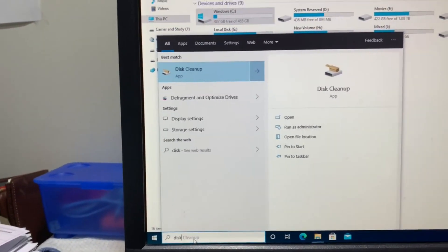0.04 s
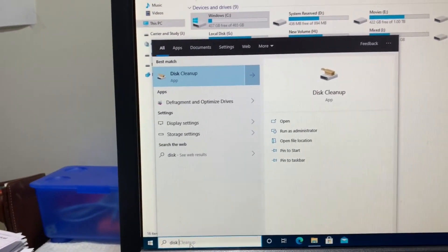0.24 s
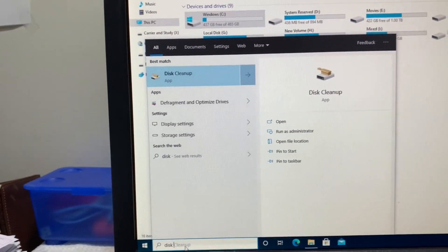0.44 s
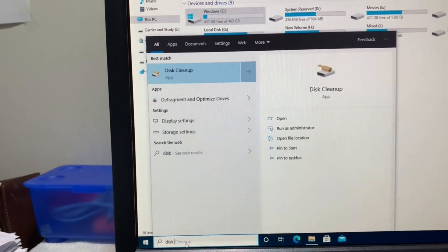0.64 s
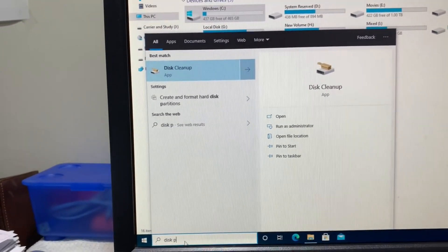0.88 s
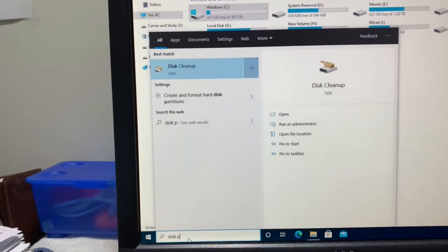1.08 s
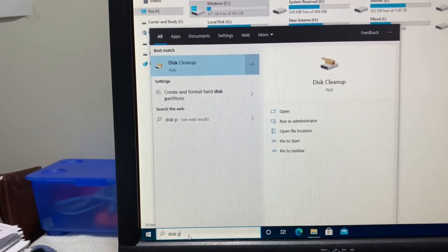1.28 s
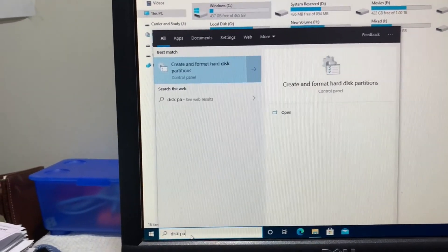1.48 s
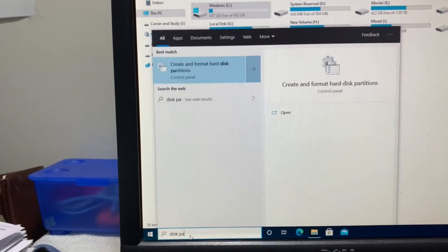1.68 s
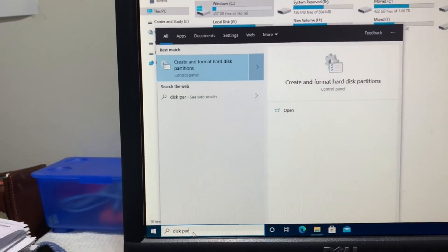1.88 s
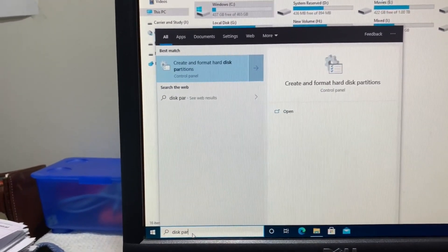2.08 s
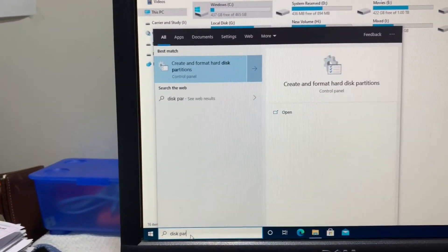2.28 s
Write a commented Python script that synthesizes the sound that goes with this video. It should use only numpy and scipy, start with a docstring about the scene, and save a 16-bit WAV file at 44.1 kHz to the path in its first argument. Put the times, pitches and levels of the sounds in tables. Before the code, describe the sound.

Slow typing on a plastic computer keyboard on a desk: a soft press, a louder space bar clatter, then spaced single keystrokes with dull thumps and springy clacks, close stereo microphone, small quiet room with low rumble.

```python
"""A few keys are typed slowly on a plastic computer keyboard on a desk, in a small quiet room.
Throughout lie a low rumble and thin hiss, both shaped noise, and a faint fan whine, a wavering sine.
From the start, noise bursts make finger ticks and landing keys; short falling sines thump the desk.
The space bar soon clatters back and knocks; more strokes follow, some with a high ping as a cap rings.
From about 0.66 s keys also spring back with a clack; the room answers with a short noise tail."""
import sys
import numpy as np
from scipy import signal
from scipy.fft import rfft, irfft, next_fast_len
from scipy.io import wavfile
from scipy.ndimage import uniform_filter1d

SR = 44100
rng = np.random.default_rng(int(sys.argv[2]) if len(sys.argv) > 2 else 0)


def wav_out(sig):
    """Save sig, one row per channel (or a flat mono array), as 16-bit PCM at SR to the path in sys.argv[1]."""
    wavfile.write(sys.argv[1], SR, np.round(np.clip(np.atleast_2d(sig).T, -1, 1) * 32767).astype(np.int16))


N = 102664  # samples in the scene


def amp(db):
    """Turn decibels into a gain."""
    return 10 ** (np.asarray(db) / 20)


def unit(x):
    """Scale to an rms (average strength) of 1."""
    return x / np.sqrt(np.mean(x ** 2) + 1e-20)


def along(points, hz):
    """Read a value between (frequency, value) points, on a log frequency axis."""
    f, v = np.transpose(points)
    return np.interp(np.log(hz + 1), np.log(f + 1), v)


def filtered(x, response):
    """Multiply the spectrum of x by a complex response of frequency."""
    n = x.shape[-1]
    padded = next_fast_len(2 * n)
    spectrum = rfft(x, padded) * response(np.fft.rfftfreq(padded, 1 / SR))
    return irfft(spectrum, padded)[..., :n]


def add(track, s, sound):
    """Mix a sound into the track at time s, trimmed to fit."""
    part = track[..., round(s * SR):][..., :sound.shape[-1]]
    part += sound[..., :part.shape[-1]]


# How alike left and right are: (frequency [Hz], likeness [0 to 1])
LIKENESS = [(60, 0.96), (200, 0.83), (500, 0.31), (1200, 0.35), (2500, 1), (15000, 0.22)]


def diffuse(size):
    """Stereo noise from all around; how alike its two sides are depends on frequency."""
    def mid_and_side(hz):
        turn = np.arccos(np.clip(along(LIKENESS, hz), -1, 1)) / 2
        return np.array([np.cos(turn), np.sin(turn)])

    mid, side = filtered(rng.standard_normal((2, size)), mid_and_side)
    return np.array([mid + side, mid - side])


def lagged(x):
    """Direct sound reaches the left microphone a little later than the right."""
    lags_s = np.array([[8 / SR], [0]])  # left, right
    return filtered(x, lambda hz: np.exp(-2j * np.pi * hz * lags_s))


def causal(gain):
    """Minimum-phase response: the given gain, with its energy as early as possible."""
    cepstrum = irfft(np.log(np.maximum(gain, 1e-6)))
    half = len(cepstrum) // 2
    cepstrum[1:half] *= 2
    cepstrum[half + 1:] = 0
    return np.exp(rfft(cepstrum))


def ringing(x, modes):
    """Add the ring of a body: each mode is a resonance that x sets going."""
    def response(f):
        total = 1
        for hz, db, t60 in modes:
            damping = 1j * f * np.log(1000) / np.pi / t60
            total = total + amp(db) * damping / (hz * hz - f * f + damping)
        return total

    return filtered(x, response)


# Colour of the room rumble: (frequency [Hz], relative level [dB])
RUMBLE_COLOUR = [(20, -53), (30, -23.5), (42, -4.5), (70, 2.5), (97, -5.5), (125, 1), (146, -9.5),
                 (184, -6.5), (220, -19.5), (264, -15.5), (325, -24), (450, -42), (900, -75)]
# Colour of the thin hiss: (frequency [Hz], relative level [dB])
HISS_COLOUR = [(240, -40), (400, -11), (820, -12), (960, -8), (1150, -14), (1450, -15), (2500, -22),
               (5000, -27), (8000, -29), (11000, -27), (13500, -31), (15500, -27)]
RUMBLE_DB, HISS_DB, WHINE_DB = -56, -77, -81.5  # rms levels at the microphones' input
WHINE_HZ, WHINE_WAVER_HZ = 1267, 5.1  # mean pitch, rms wander


def background():
    """Shaped noise makes rumble and hiss; a sine of randomly wandering pitch makes the fan whine."""
    def noise(colour):
        return unit(filtered(diffuse(N), lambda hz: amp(along(colour, hz))))

    waver = unit(uniform_filter1d(rng.standard_normal(N), size=1200))
    whine = unit(np.sin(2 * np.pi * np.cumsum(WHINE_HZ + WHINE_WAVER_HZ * waver) / SR))
    rumble, hiss = noise(RUMBLE_COLOUR), noise(HISS_COLOUR)
    return amp(RUMBLE_DB) * rumble + amp(HISS_DB) * hiss + amp(WHINE_DB) * whine


BASS_HZ, TREBLE_HZ = 403, 3120  # corners of the two tone shelves
SNAP_DB, SNAP_S = -5, 0.0057  # crack relative to rattle; its 60 dB fall time before the rise adds to it
DIRECT_DB = -2.5  # direct relative to scattered rattle
GRAIN_DB = 2.5  # rms unevenness of the rattle
CAP_WIDTH_OCT = 0.22  # half-width of a key's own resonance, in octaves
SWELL_DB, SWELL_S = -15.5, 0.023  # swell relative to the rattle's envelope; time to grow by 60 dB


def contacts(rows, colour, size=8192, lead_size=1024):
    """Plastic on plastic: noise swells briefly before each contact, then cracks and rattles."""
    out = np.zeros((2, N + lead_size))
    t = (np.arange(size) - lead_size) / SR  # zero at the moment of contact
    hz = np.fft.rfftfreq(size, 1 / SR)
    after, before = np.maximum(t, 0), np.minimum(t, 0)
    for s, db, bass_db, treble_db, t60, rise_s, cap_hz, cap_db in rows:
        rise = 1 - np.exp(-(after / rise_s) ** 2)
        snap_fall = amp(-60 * after / (SNAP_S + 2 * rise_s))
        snap = unit(rng.standard_normal(size) * rise * snap_fall)

        grain = amp(GRAIN_DB * unit(uniform_filter1d(rng.standard_normal(size), size=40)))
        swell = amp(SWELL_DB + 60 * before / SWELL_S)
        chatter = diffuse(size) + amp(DIRECT_DB) * lagged(rng.standard_normal(size))
        rattle = unit(chatter * grain * (swell + rise) * amp(-60 * after / t60))

        bass_shelf_db = bass_db / (1 + (hz / BASS_HZ) ** 2)
        treble_shelf_db = treble_db * hz ** 2 / (hz ** 2 + TREBLE_HZ ** 2)
        octaves_off = np.log2((hz + 1) / cap_hz)
        peak_db = cap_db / (1 + (octaves_off / CAP_WIDTH_OCT) ** 2)
        tone = amp(bass_shelf_db + treble_shelf_db + peak_db)
        body = causal(unit(amp(along(colour, hz))) * tone)

        contact = irfft(rfft(amp(SNAP_DB) * lagged(snap) + rattle) * body)
        add(out, s, amp(db - 16.5) * contact)  # one trim for every contact
    return out[:, lead_size:]


# Fingers meeting or brushing key caps: (time [s], relative level [dB], bass shelf [dB],
# treble shelf [dB], rattle's 60 dB fall [s], rise [s], key resonance [Hz], its boost [dB])
TOUCH_ROWS = [(.0148, -51, 18, -3, 0.016, 0.0022, 2400, -1),
              (.1175, -41, -3, -12.5, 0.032, 0.00054, 1600, 2), (.494, -68, 21, 8, 0.009, 0.0026, 3000, 1),
              (.5, -48.5, 10, -5.5, 0.073, 0.00023, 2900, 11),
              (.506, -56, -5, -7, 0.075, 0.00045, 1500, 15.5),
              (.524, -52.5, 9, -3.5, 0.078, 0.0029, 3320, 5.5),
              (.643, -63.5, 31, -3, 0.11, 0.00053, 3200, 17),
              (1.0818, -46, -11, 0, 0.025, 0.0001, 3000, 8.5),
              (1.088, -42.5, -10, -14, 0.057, 0.0017, 3000, 4),
              (1.153, -52.5, 25, 1.5, 0.022, 0.0056, 2800, -4),
              (1.173, -50.5, -2, -12, .03, 0.0011, 1900, 7.5),
              (1.2055, -58.5, 17, -10.5, .015, 0.00035, 3700, 5.5),
              (1.24, -53.5, 34, -17, 0.1, 0.00077, 2820, 7),
              (1.262, -47.5, 21, -9, 0.11, 0.0024, 2700, 0.5),
              (1.277, -50.5, 15, -2.5, 0.12, 0.0046, 2780, 5),
              (1.289, -42.5, -4, -18.5, 0.057, 0.00074, 3900, 10),
              (1.321, -52.5, 7, -21.5, 0.031, 0.0013, 2530, 10.5),
              (1.545, -41.5, 16, -3, 0.095, 0.002, 2900, 1.5),
              (1.56, -57.5, 21, -3.5, 0.043, 0.00049, 4450, 22),
              (1.577, -54.5, 26, -24, 0.046, 0.00054, 2500, 13),
              (1.7125, -37.5, -11, -29.5, 0.033, 0.00092, 2200, 8.5),
              (1.909, -63.5, 25, -24.5, 0.025, 0.0085, 3650, 12)]
# Colour of a touch: (frequency [Hz], relative level [dB])
TOUCH_COLOUR = [(100, -13.5), (400, -9.5), (900, 0.5), (1400, 1), (2000, -1.5), (3200, 1.5), (4800, -12),
                (7000, -12.5), (10000, -25), (15500, -23)]


def touches():
    """Fingers tick or brush on the caps, as contacts with the touch colour."""
    return contacts(TOUCH_ROWS, TOUCH_COLOUR)


# Ring of the keyboard case: (frequency [Hz], relative level [dB], 60 dB fall [s])
CASE_MODES = [(320.5, 4.5, 0.65), (412.4, 0.5, 0.068), (611, 2, 0.25), (791, -6.5, 0.097), (989, -1, 0.34),
              (1100, -19.5, 0.24), (1251, -3, 0.049), (2410, -3, 0.071), (3670, 4, .06), (8000, -34, 0.043)]


def case(contact_sound):
    """Every key contact sets the same plastic case ringing."""
    return ringing(contact_sound, CASE_MODES)


# Keys landing on their rubber domes and settling: (time [s], relative level [dB], bass shelf [dB],
# treble shelf [dB], rattle's 60 dB fall [s], rise [s], key resonance [Hz], its boost [dB])
LANDING_ROWS = [(.0218, -47, 11, 19.5, 0.097, 0.00091, 1200, 5.5),
                (.028, -44.5, 5, 11.5, 0.085, .0006, 900, 5.8),
                (.036, -49.5, 10.5, 3, 0.059, 0.00079, 470, 11),
                (.053, -53.5, 18, 11, 0.11, 0.0017, 1240, 2.7),
                (.0735, -44.5, -23, 3, 0.083, 0.00065, 1090, 3.2),
                (.092, -47, -14, 12, 0.11, .0015, 1200, 3), (.1035, -53.5, -2, 24, 0.12, .0005, 1700, 3.4),
                (.5305, -43.5, 10.5, -20, 0.1, 0.00081, 746, 9.7),
                (.563, -47.5, -6.5, -17, 0.043, 0.0035, 1010, 1.8),
                (.583, -53.5, 9, -8, 0.14, 0.0003, 1070, 9.6),
                (1.159, -53, 8.5, 29.5, 0.099, 0.00022, 1480, 6.4),
                (1.173, -55, 9.5, 31, 0.1, 0.00047, 264, 17.8), (1.207, -50, 2, 5, 0.11, 0.0005, 296, 6.8),
                (1.561, -46.5, 8, 4, 0.055, 0.0023, 620, 13.4),
                (1.592, -49.5, 2.5, 0, 0.086, 0.0018, 1130, 4.5)]
# Colour of a landing: (frequency [Hz], relative level [dB])
LANDING_COLOUR = [(60, -9), (200, 5.5), (400, 0.5), (750, 1.5), (1200, -1.5), (2000, -10.5), (4000, -31.5),
                  (8000, -50.5), (15500, -47.5)]


def landings():
    """Keys bottom out on rubber and settle, as contacts with the landing colour."""
    return contacts(LANDING_ROWS, LANDING_COLOUR)


# How long the room rings: (frequency [Hz], 60 dB fall [s])
ROOM_FALL = [(100, 1), (400, 0.38), (1500, 0.32), (4000, 0.5), (8000, 0.19), (15000, 0.52)]
ROOM_DB = -14.5  # room tail relative to the dry sound


def room(x):
    """The walls answer after 5 ms with a noise tail that fades at its own rate in each band."""
    hz, t, bands = signal.stft(diffuse(SR // 2), SR, nperseg=256)
    fall = amp(-60 * t / along(ROOM_FALL, hz)[:, None])
    tail = signal.istft(bands * fall, SR, nperseg=256)[1]
    delayed = np.pad(tail, ((0, 0), (SR // 200, 0)))
    return signal.fftconvolve(x, delayed / np.linalg.norm(tail[0]), axes=1)[:, :N]


# Pushes into the desk: (time [s], level [dB], pitch [Hz]), level being the peak envelope before the ring
THUMP_ROWS = [(0.031, -34, 77), (0.139, -37.5, 133), (0.539, -33, 68), (0.678, -44, 122),
              (1.1674, -29.5, 85.3), (1.206, -36, 98), (1.582, -37, 85.5), (1.747, -41, 79)]
# Ring of the desk top: (frequency [Hz], relative level [dB], 60 dB fall [s])
DESK_MODES = [(121.36, 9, 0.24), (177, -8, 1), (247, -1.5, 0.32)]
THUMP_RISE_S, THUMP_T60_S = 0.0011, 0.033  # rise time constant, 60 dB fall time


def desk():
    """Each push swings the desk top as a short, fast-fading sine, which also rings its modes."""
    out, t = np.zeros(N), np.arange(SR // 4) / SR
    envelope = (1 - np.exp(-t / THUMP_RISE_S)) ** 2 * amp(-60 * t / THUMP_T60_S)
    for s, db, hz in THUMP_ROWS:
        add(out, s, -amp(db) * envelope / envelope.max() * np.sin(2 * np.pi * hz * t))
    return ringing(out, DESK_MODES)


# The space bar clattering back up: (time [s], relative level [dB], bass shelf [dB],
# treble shelf [dB], rattle's 60 dB fall [s], rise [s], bar resonance [Hz], its boost [dB])
BAR_ROWS = [(.129, -29.5, -7.5, 1.1, 0.053, 0.00069, 1310, 3.3),
            (.1338, -31, 10.5, -6.2, 0.026, 0.00074, 1410, 3.6),
            (.141, -33.5, 11, -0.5, 0.023, 0.0012, 407, 9.2)]
# Colour of the space bar: (frequency [Hz], relative level [dB])
BAR_COLOUR = [(100, -14), (350, -3), (560, -11.5), (800, 1), (1400, -2), (2100, -7), (3400, -8.5),
              (5200, -16.5), (6300, -4.5), (8500, -17.5), (11000, -9.5), (13300, -27.5), (15300, -14)]


def space_bar():
    """The space bar clatters back up, as contacts with its own colour."""
    return contacts(BAR_ROWS, BAR_COLOUR)


# Hollow tones of the space bar's knock: (frequency [Hz], starting level [dB], 60 dB fall [s])
KNOCK_MODES = [(318, -35, 0.13), (381.7, -38.5, 0.11), (205.5, -45.5, 0.263)]


def bar_knock():
    """The bar's wire seats and knocks the case: a few fading sines give a hollow sound."""
    t = np.maximum(np.arange(N) / SR - .1395, 0)  # seconds since the knock
    return sum(amp(db - 60 * t / t60) * np.sin(2 * np.pi * hz * t) for hz, db, t60 in KNOCK_MODES)


# Hard taps that ring a key cap: (time [s], level [dB]), level being before the rise and fall
PING_ROWS = [(0.4997, -46), (0.6681, -24.5), (1.2982, -33.5), (1.3205, -49), (1.545, -43), (1.725, -41),
             (1.7304, -30)]
PING_HZ, PING_SPREAD_HZ = 8560, 33  # mean pitch, random spread between taps
PING_RISE_S, PING_T60_S = 0.00037, 0.008  # rise time constant, 60 dB fall time


def pings():
    """A hard tap makes a small key cap ring high and briefly, as a fast-fading sine."""
    out, t = np.zeros(N), np.arange(SR // 10) / SR
    ring = (1 - np.exp(-t / PING_RISE_S)) * amp(-60 * t / PING_T60_S)
    for s, db in PING_ROWS:
        hz = rng.normal(PING_HZ, PING_SPREAD_HZ)
        add(out, s, amp(db) * ring * np.sin(2 * np.pi * hz * t))
    return lagged(out)


# Keys springing back against their stops: (time [s], relative level [dB], bass shelf [dB],
# treble shelf [dB], rattle's 60 dB fall [s], rise [s], key resonance [Hz], its boost [dB])
RELEASE_ROWS = [(.658, -43.5, -2, -8, 0.087, 0.0002, 820, 2.6),
                (.667, -50, 14, 7.5, 0.027, 0.00089, 3130, 12),
                (.671, -48, 17, -13.5, 0.072, 0.0019, 417, 8.5),
                (1.299, -44, 4.5, -11.5, 0.087, 0.0007, 614, 6.5),
                (1.6285, -44.5, 8, -34, 0.011, 0.00046, 1070, 15),
                (1.63, -47.5, -4, -13, 0.025, .0004, 1960, 15.6),
                (1.7272, -41.5, 7, -8, 0.013, 0.00033, 850, 8.4),
                (1.7315, -45, 14.5, -2, 0.059, 0.0012, 2240, 8)]
# Colour of a release: (frequency [Hz], relative level [dB])
RELEASE_COLOUR = [(100, -2), (350, -7), (800, 1), (1300, 3), (2100, -11), (3400, -10.5), (5000, -16.5),
                  (7000, -12), (11500, -12.5), (13000, -24), (15500, -30)]


def releases():
    """Keys spring back and clack on their stops, as contacts with the release colour."""
    return contacts(RELEASE_ROWS, RELEASE_COLOUR)


def scene():
    """Keyboard and desk in the room; the pings are heard directly only."""
    keys = case(touches() + landings() + space_bar() + releases())
    typing = keys + desk() + bar_knock()
    return background() + typing + amp(ROOM_DB) * room(typing) + pings()


# Balance of the two microphones: (frequency [Hz], left minus right [dB])
BALANCE = [(30, 13.5), (80, -6), (160, -4), (400, 0.5), (700, -4), (1200, -1), (4000, -2), (12000, 0.5)]


def record(dry):
    """Two microphones differ in balance by frequency; the deepest bass and the top are cut away."""
    low_cut = signal.butter(N=4, Wn=39, btype="high", fs=SR, output="sos")  # Wn in Hz
    cut = signal.sosfilt(low_cut, dry)
    shares = np.array([[.5], [-.5]])  # half the difference to each side
    leaning = filtered(cut, lambda hz: amp(along(BALANCE, hz) * shares))
    top_cut = signal.butter(N=20, Wn=15800, fs=SR, output="sos")  # Wn in Hz
    return signal.sosfilt(top_cut, leaning)


dry = scene()
out = record(dry)
wav_out(out)
```